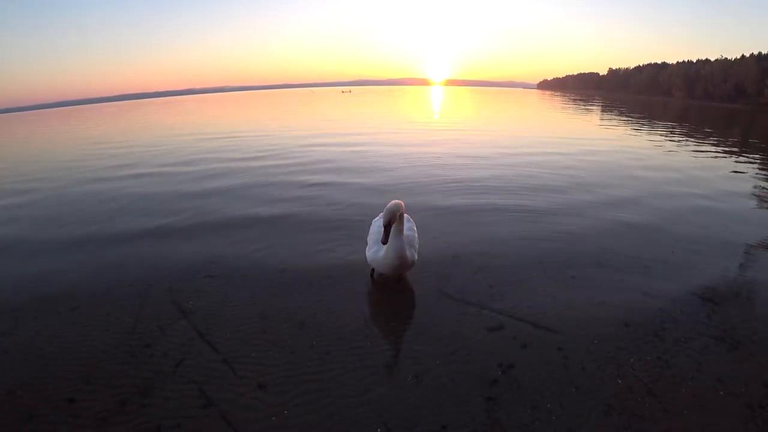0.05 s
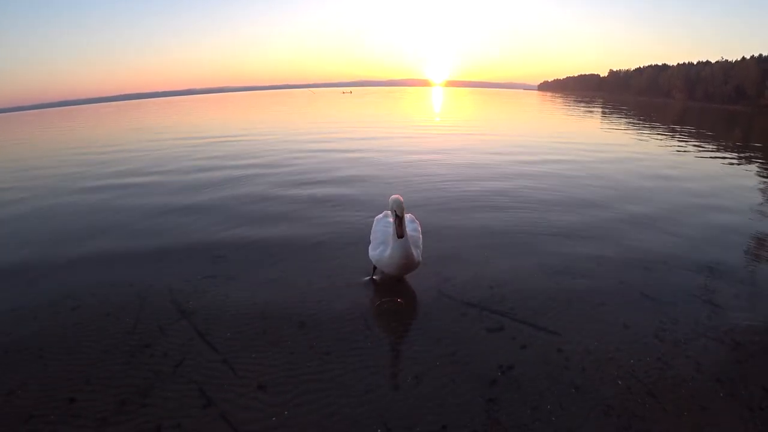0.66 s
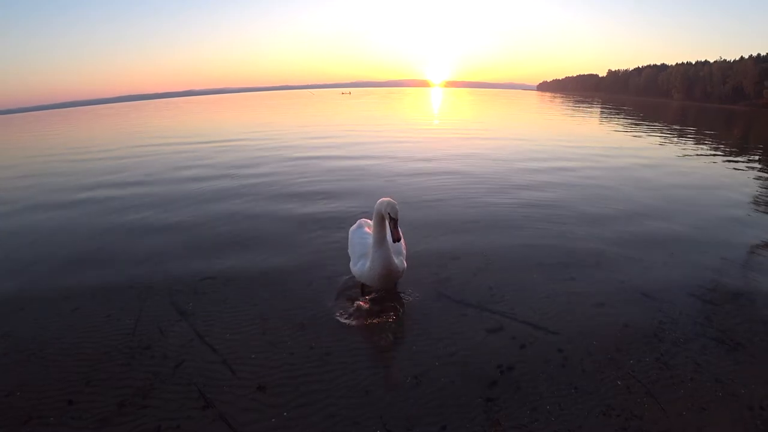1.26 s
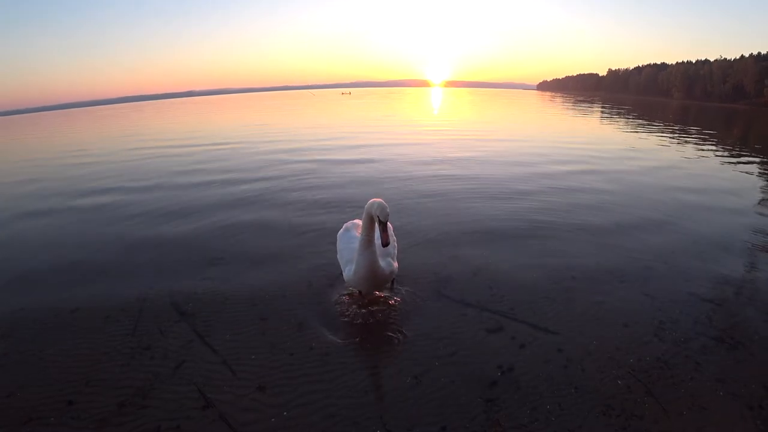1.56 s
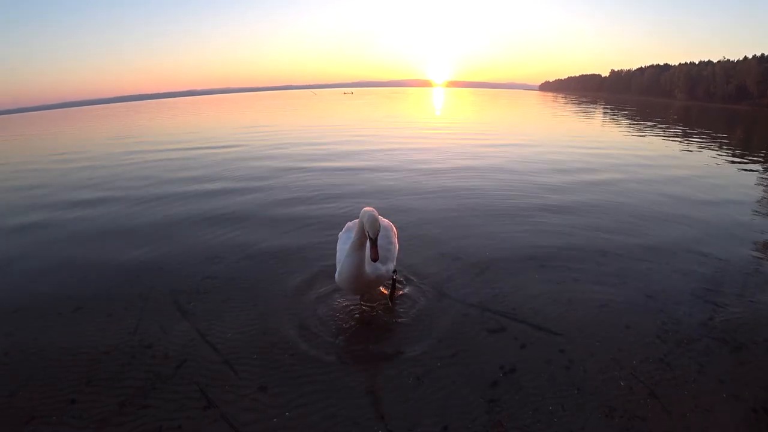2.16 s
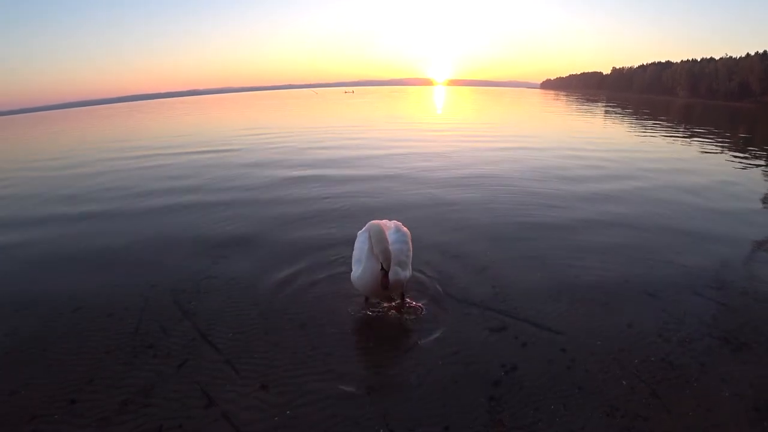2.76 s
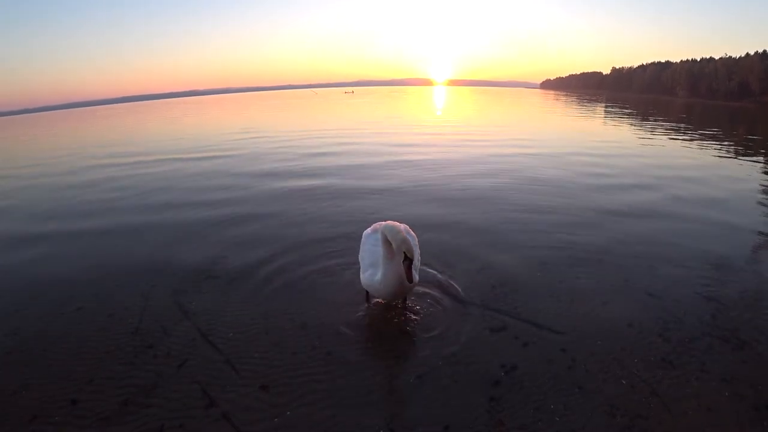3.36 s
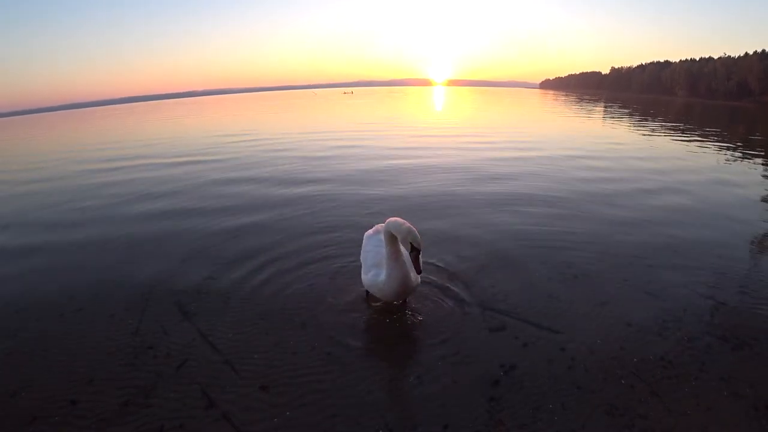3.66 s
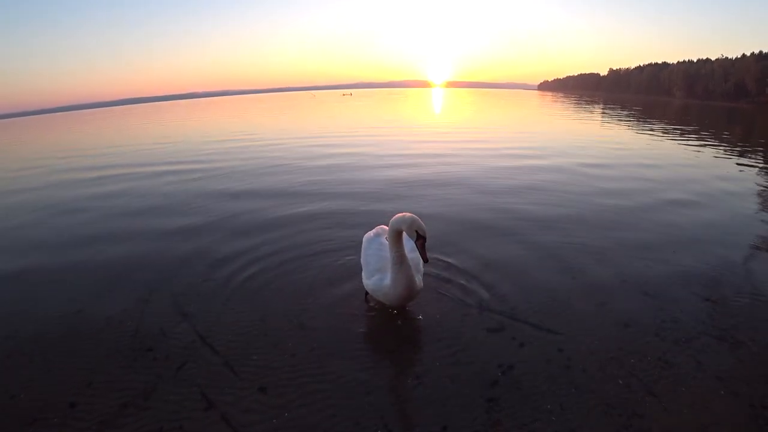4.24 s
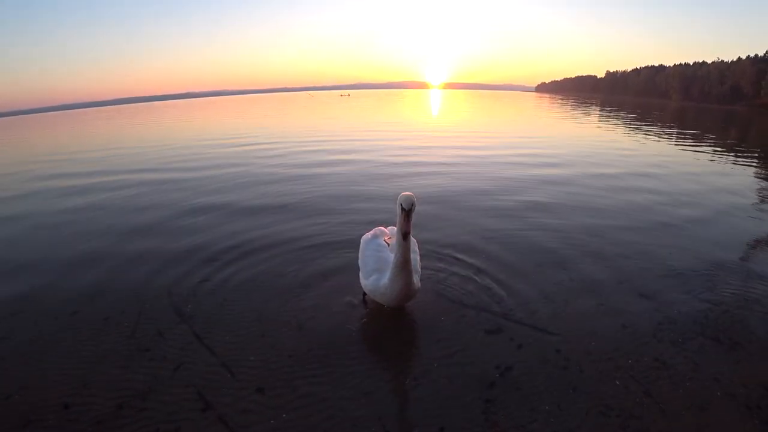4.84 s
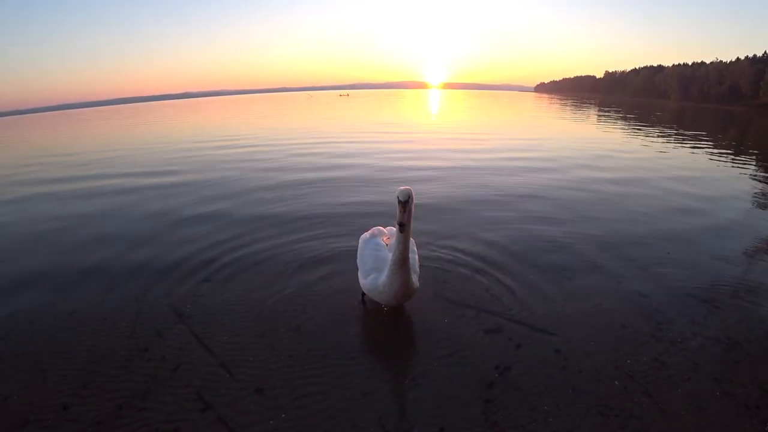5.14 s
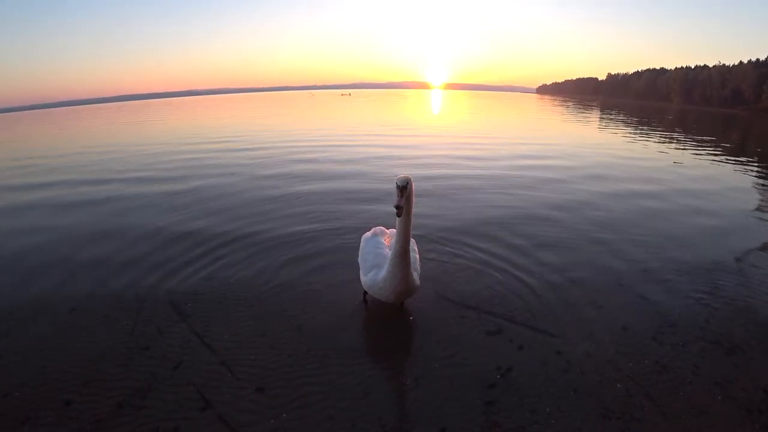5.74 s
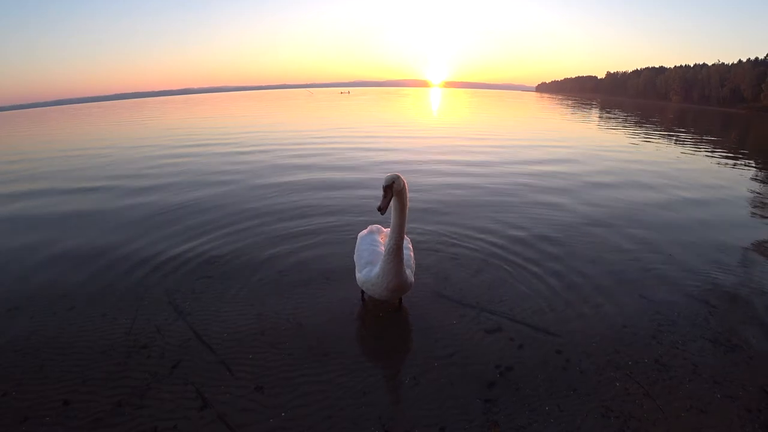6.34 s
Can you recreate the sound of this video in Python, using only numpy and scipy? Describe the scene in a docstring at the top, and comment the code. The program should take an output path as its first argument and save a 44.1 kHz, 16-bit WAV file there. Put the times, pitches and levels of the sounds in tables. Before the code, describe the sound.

On a calm lake, a swan's breathy hiss slowly swells, with a low growl pulsing underneath. Its feet splash and gurgle in the shallows as the hiss builds, then again just after it stops. Drips fade, feathers rustle softly, and the swan gives a second long, growling hiss. A few soft bumps touch the hand-held microphone over faint outdoor air.

```python
"""A breathy hiss swells out of the faint air over a calm lake: a swan, wading through the shallows.
It hisses twice, air rushing through its bill, with a low growl from the syrinx pulsing under each hiss.
The flat water mirrors its voice: the echo comes later as the neck rises, so hollow notches slide down
the hiss. Soft bumps shake the hand-held camera, the feet splash and shed bubbles, and the feathers
rustle before the second hiss."""
import sys
import numpy as np
from scipy import signal
from scipy.fft import rfft, irfft, next_fast_len
from scipy.io import wavfile
from scipy.ndimage import map_coordinates

SR = 44100
rng = np.random.default_rng(int(sys.argv[2]) if len(sys.argv) > 2 else 0)


def persist_wave(psi):
    """Save psi, clipped to +-1, as 16-bit WAV."""
    counts = np.round(np.clip(psi, -1, 1) * 32767).astype(np.int16)
    wavfile.write(sys.argv[1], SR, np.atleast_2d(counts).T)


N = 282240
TIME = np.arange(N) / SR

# strides through the shallows: foot lifts t/s, foot lands t/s, stirred water level/dB
WADING_STRIDES = [(0.881, 1.311, -46), (2.203, 2.602, -56.5)]


def amp(db):
    """Decibels to gain."""
    return 10 ** (np.asarray(db) / 20)


def unit(x):
    """Scale to rms 1."""
    return x / np.sqrt(np.mean(x ** 2) + 1e-20)


def along(points, hz):
    """Read (f/Hz, value) points on a log frequency axis."""
    freqs, values = np.transpose(points)
    return np.interp(np.log(hz + 1), np.log(freqs + 1), values)


def curves(rows):
    """An automation curve for each column after the time."""
    times, *columns = np.transpose(rows)
    return [np.interp(TIME, times, column) for column in columns]


def gate(rows):
    """1 while a table lasts, with soft edges."""
    start, end = rows[0][0], rows[-1][0]
    return np.interp(TIME, [start - .03, start, end, end + .11], [0, 1, 1, 0])


def wobble(rate):
    """A smooth random curve, rate knots a second."""
    coarse = TIME[::32]
    knots = rng.standard_normal(int(N * rate / SR) + 4)
    return np.interp(TIME, coarse, map_coordinates(knots, [coarse * rate]))


def filtered(x, response):
    """Filter x by a complex response of frequency."""
    size = next_fast_len(N + SR // 2)
    return irfft(rfft(x, size) * response(np.fft.rfftfreq(size, 1 / SR)), size)[..., :N]


def coloured(x, spectrum, size=8192):
    """A minimum-phase EQ with the gains of a spectrum."""
    gains = amp(along(spectrum, np.fft.rfftfreq(size, 1 / SR)))
    cepstrum = irfft(np.log(gains + 1e-6))
    cepstrum[1:size // 2] *= 2
    cepstrum[size // 2 + 1:] = 0
    return signal.oaconvolve(x, irfft(np.exp(rfft(cepstrum))))[:N]


def noise(spectrum):
    """Coloured noise of rms 1."""
    return unit(coloured(rng.standard_normal(N), spectrum))


def add(track, s, sound):
    """Mix a short sound in at time s."""
    part = track[max(round(s * SR), 0):][:len(sound)]
    part += sound[:len(part)]


def calm_air(mid_db=-62, side_db=-60.5):
    """A bed of faint rumble and hiss from the still evening, as mid and side."""
    # open air over the lake, ahead and from the sides: f/Hz, level/dB
    mid_colour = [(15, -32), (30, -1), (55, -2), (110, -7), (200, -12), (450, -18), (1100, -21),
                  (1400, -23), (3000, -26), (6300, -26.5), (8700, -22), (12000, -29), (15800, -32)]
    side_colour = [(12, -46), (20, -3), (98, -14), (209, -1.5), (254, -5), (335, -3.5), (1110, -2),
                   (3310, -14.5), (10400, -20), (15800, -30)]
    bed = np.array([amp(mid_db) * noise(mid_colour), amp(side_db) * noise(side_colour)])
    return bed * amp(0.3 * wobble(4.2))


def hiss(air, bill, cycles, pulsing, air_db, whistle_db, rattle_db, upper_ratio, upper_db,
         opening_s, sharp, shut_db, treble_hz, whistle_width_hz=280, fade_db=4, dull_db=-3):
    """Air rushes through the bill, chopped by the growl; a weak flow is duller and whistles more."""
    # breathy whistle at the edge of the bill: t/s, f/Hz, level/dB
    edge_whistle = [(0, 8600, -1), (.18, 8100, 7), (.33, 7950, -14), (.7, 7900, -1), (1.65, 7400, 3),
                    (2.1, 7630, -11), (5, 7210, -2), (5.6, 7600, 5), (6.2, 7880, 2.5)]
    # air in each growl pulse: f/Hz, level/dB
    puff_colour = [(200, -28), (550, -12), (1000, -6), (1600, -29), (3000, -9), (8000, -37)]
    flow_db, = curves(air)
    effort = amp(flow_db - flow_db.max())
    shut = np.clip((TIME[np.argmax(flow_db)] - TIME) / opening_s, 0, 1)
    # two narrow bands of noise glide together as the bill moves
    white = rng.standard_normal((2, N))
    lower, upper = unit(filtered(white, lambda hz: 1 / (1 + (hz / whistle_width_hz) ** 2)))
    pitch, edge_db = curves(edge_whistle)
    phase = 2 * np.pi * np.cumsum(pitch) / SR
    whistle = unit(lower * np.sin(phase) + amp(upper_db) * upper * np.sin(upper_ratio * phase) * effort)
    whistle *= amp(whistle_db + edge_db - fade_db * effort)
    # as the bill opens toward the strongest flow, its resonances sink and the treble comes out
    rush = map_coordinates(noise(bill), [np.cumsum(1 + sharp * shut)], mode="wrap")
    sizzle = filtered(rush, lambda hz: hz ** 4 / (hz ** 4 + treble_hz ** 4))
    treble_gain = amp(dull_db * (0.5 - effort) + shut_db * shut)
    rush = rush + sizzle * (treble_gain - 1) + whistle
    # each opening of the syrinx lets out a short rattling puff
    beat = np.cos(2 * np.pi * (cycles - .2))
    puffs = noise(puff_colour) * ((1 + beat) / 2) ** 3 * pulsing * amp(rattle_db)
    envelope = amp(flow_db + air_db + 0.26 * wobble(45)) * gate(air)
    return (rush * (1 + pulsing * beat) + puffs) * envelope


def lake_echo(voice, strength=0.68, dull_hz=7000):
    """The voice plus one late copy off the lake, a sliding comb; ripples scatter the copy's treble."""
    # extra travel time off the water, longer as the head rises: t/s, delay/ms
    echo_lag = [(0, 1.62), (.33, 1.89), (1.38, 2.08), (1.6, 2.215), (2.1, 2.335), (4.85, 2.823),
                (5.62, 3.085), (6, 3.045), (6.4, 2.98)]
    delay_ms, = curves(echo_lag)
    late = map_coordinates(voice, [np.arange(N) - delay_ms * SR / 1000])
    return voice + filtered(late, lambda hz: strength / (1 + (hz / dull_hz) ** 2))


def camera_bumps(attack_s=0.003, level_db=-3):
    """Soft bumps ring the camera mount, which mostly rocks the two microphones against each other."""
    # handling bumps: t/s, level/dB
    knocks = [(0.465, -31), (.701, -36), (2.061, -29), (2.16, -42.5), (2.437, -38.5), (2.832, -40.5),
              (2.874, -44), (3.029, -37.5), (3.691, -37.5)]
    # modes of the mount: f/Hz, mid level/dB, side level/dB, t60/s
    mount_modes = [(71.6, -1.5, -37, 0.084), (110.6, -9.5, -9.5, 0.29), (195, 3.5, 7, 0.077),
                   (233, -7, 3, 0.058), (328, -9, -2, 0.1), (496, -18, -9, 0.1), (668, -8, 3, 0.032)]
    mid, side = np.zeros((2, N))
    t = np.arange(SR // 4) / SR
    for s, db in knocks:
        for hz, mid_db, side_db, t60 in mount_modes:
            size, tuning = rng.normal([1, 1], [.12, .03])
            ring = size * amp(db + level_db - 60 * t / t60) * np.sin(2 * np.pi * hz * tuning * t)
            ring *= 1 - np.exp(-t / attack_s)
            add(mid, s, amp(mid_db) * ring)
            add(side, s + 1 / (4 * hz), amp(side_db) * ring)  # a quarter cycle late
    return np.array([mid, side])


def stir(lift_db_per_s=92, swing_db_per_s=17.5, settle_db_per_s=280, ripple_db=-14, ebb_db_per_s=11.5):
    """Envelope of the stirred water: it builds as a foot lifts and swings, then settles into ripples."""
    out = np.zeros(N)
    for lift, land, db in WADING_STRIDES:
        lift_db = -lift_db_per_s * np.maximum(lift - TIME, 0)
        swing_db = -swing_db_per_s * np.maximum(land - TIME, 0)
        after_s = np.maximum(TIME - land, 0)
        tail_db = np.maximum(-settle_db_per_s * after_s, ripple_db - ebb_db_per_s * after_s)
        out += amp(db + lift_db + swing_db + tail_db)
    return out


def gurgle(count, low_hz, high_hz, ring_cycles):
    """A cloud of small bubbles, each a brief rising ring, rms 1."""
    t = np.arange(SR // 80) / SR
    when, pitch, size = rng.random((count, 3)).T[:, :, None]
    hz = low_hz * (high_hz / low_hz) ** pitch
    age = t * hz / ring_cycles
    rings = size ** 2 * age * np.exp(-age) * np.sin(2 * np.pi * hz * t * (1 + 8 * t))
    places = (when * N).astype(int) + np.arange(len(t))
    return unit(np.bincount(places.ravel(), rings.ravel(), N)[:N])


def droplets(per_second):
    """A hail of tiny impacts of very unequal size, rms 1."""
    # spray landing on water: f/Hz, level/dB
    spray_colour = [(200, -12), (500, -7.5), (1500, -7), (3000, -3.5), (5000, -3), (8000, -4), (11000, -7),
                    (16000, -21)]
    hits = (rng.random(N) < per_second / SR) * rng.standard_normal(N)
    return unit(coloured(hits, spray_colour))


def trickle(drip_db=-4):
    """Water runs off the feet in small bubbles and ticking drips, and closes over each step."""
    # low gurgles of water closing over a foot: t/s, level/dB, length/s
    plops = [(1.245, -43.5, 0.068), (2.62, -55.5, 0.066), (2.872, -58, 0.052)]
    runoff = gurgle(count=4000, low_hz=782, high_hz=10150, ring_cycles=1.83)
    runoff += amp(drip_db) * droplets(per_second=410)
    closing = sum(amp(db) * np.exp(-((TIME - s) / length) ** 2) for s, db, length in plops)
    return runoff * stir() + closing * gurgle(count=4000, low_hz=273, high_hz=1060, ring_cycles=0.53)


def bubble(db, hz, glide, rough=0.19, gentle_db=13.5):
    """A trapped bubble rings and rises, glide octaves per swell time; large, gentle ones last longer."""
    # 2.1 ms at 1560 Hz and -30 dB, twice as long when gentle_db softer
    swell_s = .0021 * np.sqrt(1560 / hz) * 2 ** ((-30 - db) / gentle_db)
    age = np.arange(int(10 * swell_s * SR)) / (swell_s * SR)
    tremble = map_coordinates(rng.standard_normal(24), [2 * age])
    pitch = hz * 2 ** (glide * (np.minimum(age, 4) - 1) + rough * tremble / 2)
    return amp(db) * (age * np.exp(1 - age)) ** 2 * np.sin(2 * np.pi * np.cumsum(pitch) / SR)


def bubbles(small_db=3, scatter_db=3, low_hz=1400, high_hz=5000, lead_s=0.074, linger_s=.5, count=15):
    """The feet shed bubbles at set moments, loud and faint, and small chirping ones at random during and after
    each stride."""
    # bubbles and drips at set moments, loud and faint: t/s, peak level/dB, f/Hz
    placed_bubbles = [(.845, -44, 1270), (0.874, -36, 1610), (.884, -39, 1920), (1.006, -28.5, 1760),
                      (1.031, -32.5, 1180), (1.167, -36, 2900), (1.184, -34, 606), (1.201, -30.5, 1050),
                      (1.223, -29, 1620), (1.245, -26.5, 328), (1.247, -28.5, 1145), (1.272, -34.5, 320),
                      (1.333, -29.5, 935), (2.269, -47, 3820), (2.324, -49, 1580), (2.357, -44, 710),
                      (2.376, -25, 2030), (2.481, -55.5, 3380), (2.497, -51, 1600), (2.52, -45, 2620),
                      (2.557, -20, 4930), (2.583, -41.5, 1320), (2.645, -43, 4180), (2.766, -47, 1380),
                      (2.855, -41, 1790), (2.872, -53.5, 610), (2.927, -53, 1460), (3.14, -63.5, 3420),
                      (3.212, -61, 2820), (3.31, -63, 4250)]
    out, stirred = np.zeros(N), stir()
    for s, db, hz in placed_bubbles:
        add(out, s, bubble(db, hz, glide=0.1))
    for lift, land, _ in WADING_STRIDES:
        for k, (when, pitch, size) in enumerate(rng.random((count, 3))):
            s = lift - lead_s + (land + linger_s - lift) * (k + when) / count
            db = 20 * np.log10(stirred[round(s * SR)]) + small_db + scatter_db * (2 * size - 1)
            add(out, s, bubble(db, low_hz * (high_hz / low_hz) ** pitch, glide=0.23))
    return out


def splashes(tail_db=-23, tail_t60=0.15, churn_db=-14, churn_t60=0.082, rise=0.34):
    """A slap throws a dense burst of drops and a thin after-spray; long slaps churn air under."""
    # slaps of webbed feet and falling water: t/s, level/dB, length/s
    slaps = [(0.85, -53, .001), (0.88, -45, 0.0013), (0.997, -26, 0.0057), (1.003, -36, 0.034),
             (1.024, -28, 0.0055), (1.22, -23.5, 0.0057), (2.301, -31, 0.0013), (2.34, -41.5, 0.02),
             (2.403, -42.5, .0015), (2.43, -43.5, .0051), (2.529, -44, 0.022), (2.562, -27, 0.0027),
             (2.593, -34.5, 0.0091), (2.772, -43.5, 0.0023), (2.830, -42, 0.00095)]
    force, churn = np.zeros((2, N))
    t = np.arange(SR // 5) / SR
    for s, db, length in slaps:
        attack = 1 - np.exp(-t / (rise * length))
        decay = np.exp(-(t / length) ** 2) + amp(tail_db - 60 * t / tail_t60)
        add(force, s, amp(db) * attack * decay)
        add(churn, s, amp(db + churn_db - 60 * t / churn_t60) * attack * min(length / 0.0037, 1))
    spray = force * droplets(per_second=14000)
    return spray + churn * gurgle(count=5000, low_hz=680, high_hz=2920, ring_cycles=0.56)


def growl(pace, air, throat, brighten_db, level_db, smear, jitter=0.0044, edge_db=-5, fade_s=.1):
    """Slow syrinx pulses, louder with more air, brighter as they quicken; also returns the cycle count."""
    rate, = curves(pace)
    air_db, = curves(air)
    inside_s = np.minimum(TIME - pace[0][0], pace[-1][0] - TIME)
    drive_db = 0.76 * (air_db - air_db.max())
    drive_db += edge_db * np.clip(1 - inside_s / fade_s, 0, 1)  # softer as it starts and stops
    cycles = np.cumsum(rate * (1 + jitter * wobble(60))) / SR
    harmonic = np.arange(1, 21)[:, None]
    on = gate(pace) > 0
    tilt_db = brighten_db * np.log2(rate[on] / rate.max())  # per octave of overtone
    gains = amp(along(throat, harmonic * rate[on]) + tilt_db * np.log2(np.clip(harmonic, 2, 6)))
    # the long windpipe smears each pulse: higher overtones arrive later
    phases = 2 * np.pi * harmonic * cycles[on] - smear * harmonic ** 2
    tone = np.zeros(N)
    tone[on] = np.sum(gains * np.cos(phases), axis=0) / np.sqrt(np.sum(gains ** 2, axis=0) / 2)
    return tone * amp(drive_db + level_db + 0.19 * wobble(50)) * gate(pace), cycles


def feathers(peak_s=4.38, peak_db=-60.5, rise_db_per_s=44, fall_db_per_s=42, tick_t60=0.0085, crack=.21):
    """The unfolding neck slides over the plumage: a soft rustle, with dry ticks as it swells."""
    # rubbing feathers: f/Hz, level/dB
    rustle_colour = [(150, -34), (250, -14), (354, -8), (453, -12.5), (531, -9), (1880, -11.5),
                     (8000, -20.5), (10400, -46), (17600, -120)]
    # small ticks as the head comes up: t/s, level/dB, f/Hz
    ticks = [(4.14, -49, 3060), (4.191, -46.5, 1510), (4.199, -44, 600), (4.218, -43.5, 895),
             (4.252, -42, 720), (4.282, -50, 890), (4.304, -46.5, 930)]
    swell_db = np.minimum(rise_db_per_s * (TIME - peak_s), fall_db_per_s * (peak_s - TIME))
    out = noise(rustle_colour) * amp(peak_db + swell_db)
    t = np.arange(SR // 40) / SR
    for s, db, hz in ticks:
        tick = np.sin(2 * np.pi * hz * t) + crack * rng.standard_normal(len(t))
        add(out, s, amp(db - 60 * t / tick_t60) * tick)
    return out


def scene():
    """The swan stands straight ahead and calls twice (a, b); mid and side add up to left and right."""
    # air pushed out in each hiss: t/s, level/dB
    air_a = [(0, -68), (.3, -51), (0.798, -48.5), (1.33, -36), (1.52, -30.5), (1.75, -29.5), (1.93, -32),
             (2.07, -36.5), (2.2, -54)]
    air_b = [(4.65, -73), (5.08, -37), (5.328, -33), (5.454, -33), (5.676, -36), (5.89, -35), (6.142, -40),
             (6.33, -50), (6.39, -80)]
    # turbulence in the open bill: f/Hz, level/dB
    bill_a = [(150, -44), (500, -9.5), (800, -8), (1400, -8), (2150, -3), (2500, -2), (3200, -4), (4100, 0),
              (5200, -3.5), (5900, -2.5), (7700, -0.5), (8900, -8.5), (10200, -8), (11400, -13.5),
              (12400, -17), (15800, -22.5)]
    bill_b = [(150, -31), (450, -17.5), (900, -8), (1400, -9), (1800, -15), (2500, -3.5), (3050, -8.5),
              (3650, 1), (4500, -3), (5300, -8), (5850, -2.5), (6450, -5.5), (7200, -2), (8700, -10),
              (9400, -10), (10600, -11.5), (12000, -17.5), (13000, -22), (15800, -24)]
    # pulse rate of each growl: t/s, f/Hz
    pace_a = [(1.12, 50), (1.34, 54), (1.46, 68), (1.54, 71), (1.75, 69.6), (1.91, 65), (2.01, 54.5),
              (2.12, 47)]
    pace_b = [(5.01, 48.24), (5.13, 56.57), (5.37, 64.2), (5.5, 60.8), (5.65, 54.9), (5.91, 54.12),
              (6.07, 47.07), (6.28, 33.65)]
    # colour of each growl at its fastest: f/Hz, level/dB
    throat_a = [(65, -37), (100, -10.5), (140, -1), (165, -10), (210, 6), (280, 10), (350, 1.5), (420, 4),
                (490, -12), (560, 8.5), (630, -30), (700, 4), (840, -5), (950, -9), (1300, -35)]
    throat_b = [(60, -43), (95, 5), (125, 7), (185, 2), (250, 4.5), (315, -4), (365, 3.5), (450, -2),
                (680, -3), (900, -31), (1300, -28)]
    # stereo width of the swan: f/Hz, side level/dB relative to mid
    width = [(100, -36), (400, -18), (1000, -17), (2000, -15.5), (4000, -24), (12000, -47)]
    growl_a, cycles_a = growl(pace_a, air_a, throat_a, brighten_db=32, level_db=-43.5, smear=.45)
    growl_b, cycles_b = growl(pace_b, air_b, throat_b, brighten_db=4, level_db=-45.5, smear=0.0386)
    hiss_a = hiss(air_a, bill_a, cycles_a, pulsing=0.15 * gate(pace_a), air_db=-2.4,
                  whistle_db=-8, rattle_db=-21, upper_ratio=1.37, upper_db=-3,
                  opening_s=0.99, sharp=.08, shut_db=-6.5, treble_hz=2300)
    hiss_b = hiss(air_b, bill_b, cycles_b, pulsing=0.16 * gate(pace_b), air_db=-1.14,
                  whistle_db=-12, rattle_db=-8, upper_ratio=1.27, upper_db=-16,
                  opening_s=.3, sharp=.045, shut_db=-10, treble_hz=7500)
    voice = lake_echo(growl_a + hiss_a + growl_b + hiss_b)
    swan = voice + bubbles() + splashes() + trickle() + feathers()
    spread = filtered(swan, lambda hz: 1j * amp(along(width, hz)))
    mid, side = np.array([swan, spread]) + camera_bumps() + calm_air()
    return np.array([mid + side, mid - side])


def record(dry):
    """The camera keeps nothing above its band limit."""
    return filtered(dry, lambda hz: hz < 15950)


dry = scene()
out = record(dry)
persist_wave(out)
```